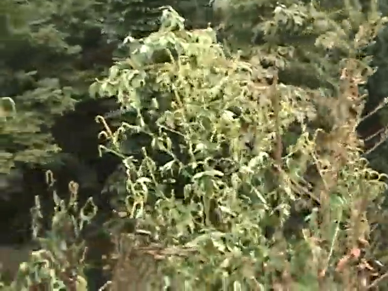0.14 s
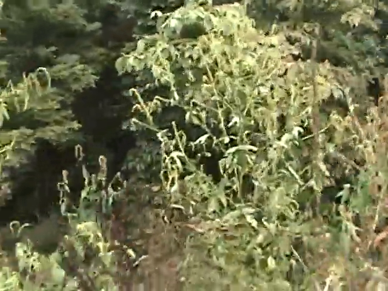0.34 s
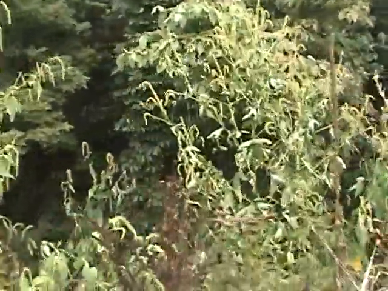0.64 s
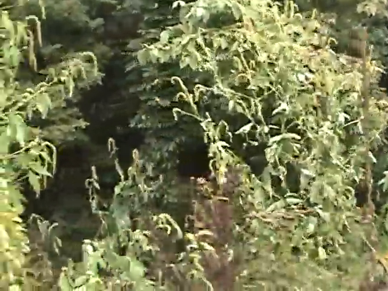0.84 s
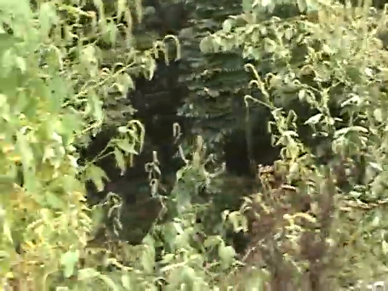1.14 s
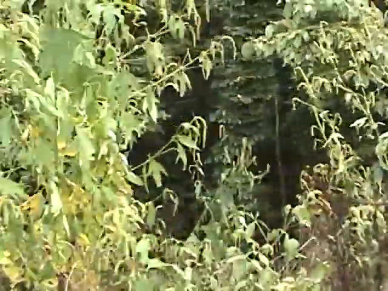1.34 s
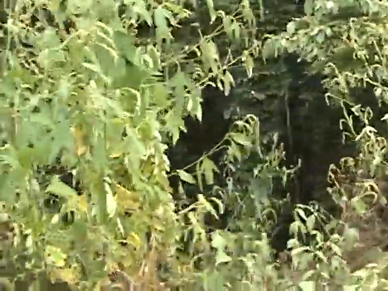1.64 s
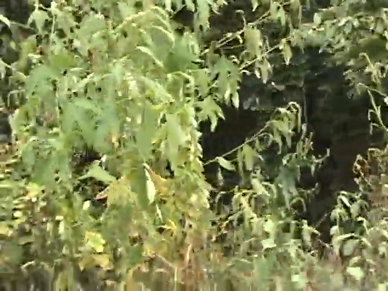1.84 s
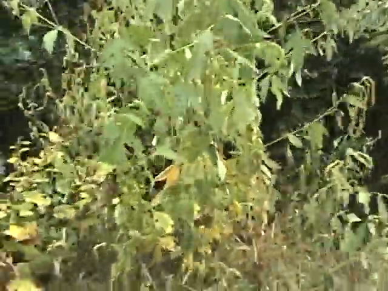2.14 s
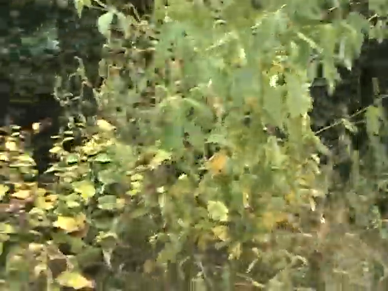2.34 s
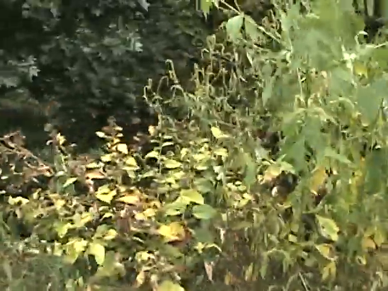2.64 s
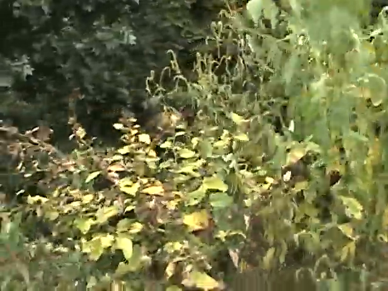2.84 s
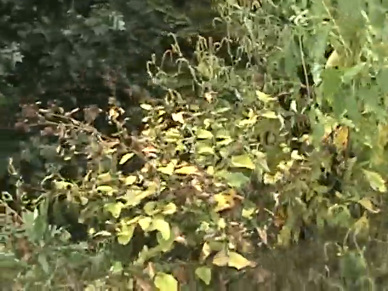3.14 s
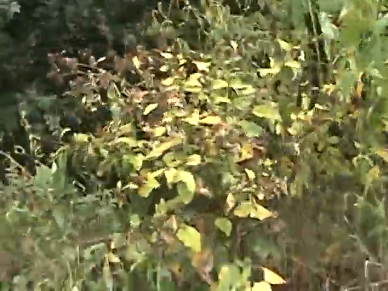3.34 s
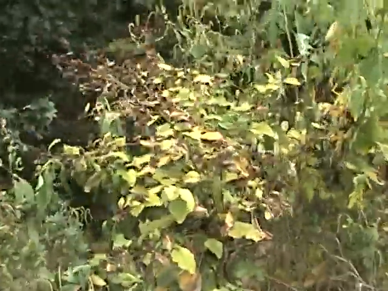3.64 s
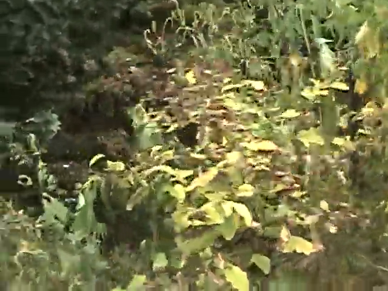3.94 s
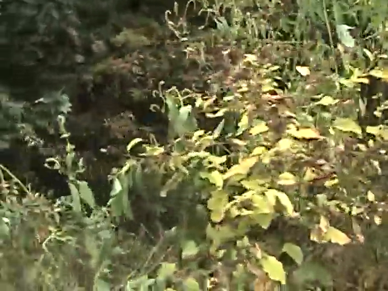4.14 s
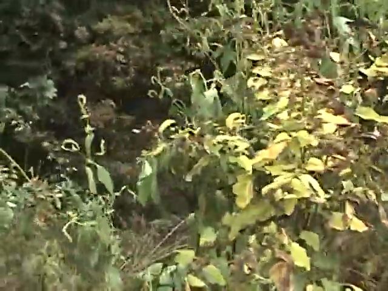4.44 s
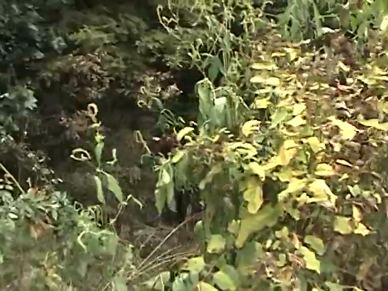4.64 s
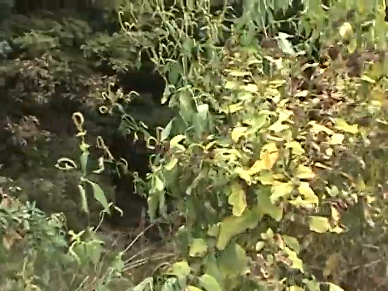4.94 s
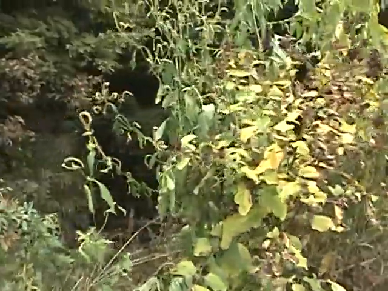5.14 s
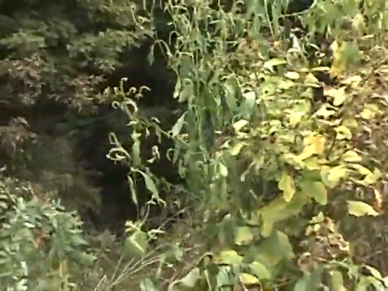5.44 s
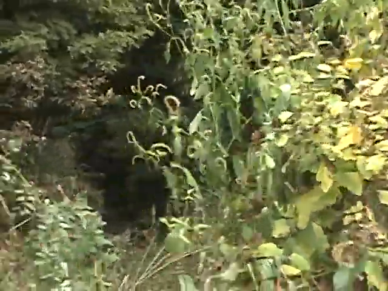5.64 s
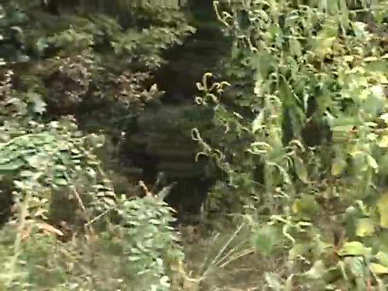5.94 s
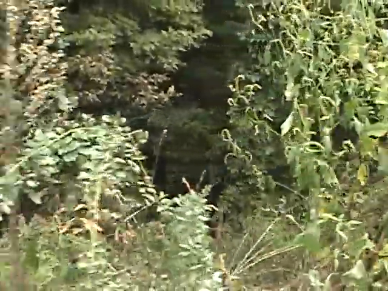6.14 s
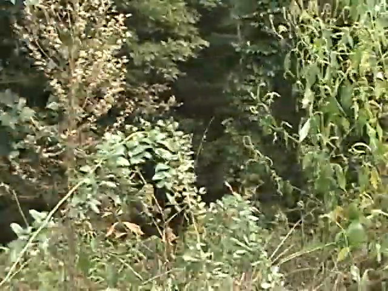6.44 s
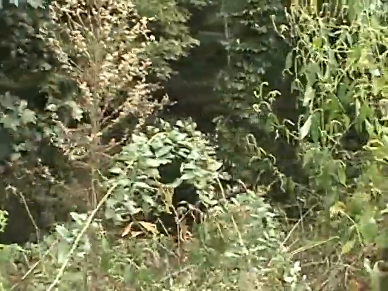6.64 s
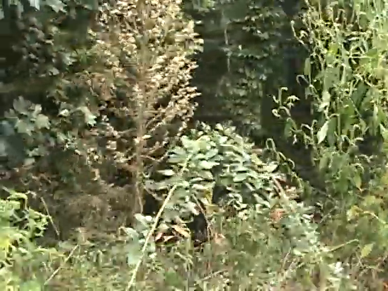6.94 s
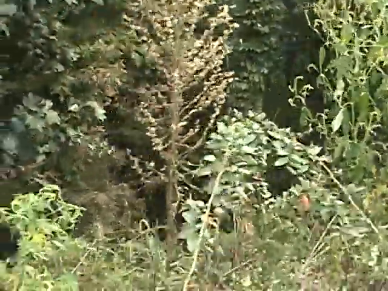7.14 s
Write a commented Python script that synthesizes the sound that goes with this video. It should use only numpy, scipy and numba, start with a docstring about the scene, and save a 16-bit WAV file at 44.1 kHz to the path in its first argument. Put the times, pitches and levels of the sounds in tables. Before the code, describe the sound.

Over a soft woodland hush and pulsing high insect choirs, crickets chirp in short bright strokes and a katydid rasps about four times a second, growing slightly louder. Some way off, a small hound bays from about 0.25 s with a hoarse bark; a sharp high cry and another bay follow near 1 s as low wind buffets the microphone around 1.3 s. After a brief gap, the pack returns at 1.7 s, overlapping long bays, rough barks and quick yips that echo among the trunks, busy and urgent from 2 to 5.9 s. Dry stalks rustle, tiny twigs tick and light camera knocks intrude, notably near 3.6 s. A stronger knock lands at 6.0 s as the echoes die, leaving crickets, insects and small handling clicks. At about 7.05 s a hoarse bark and short bays break out again, continuing almost to the end at about 7.3 s.

```python
"""In damp woods, a pack of small hounds bays some way off, voices overlapping and echoing among the trunks.
Bays are stacked partials on wavering pitches, hoarse barks are ringing slaps; yips, the scooped starts of
barks and a faint far call are short glides. Crickets chirp as short fading tones; katydids and far insect
choirs are pulsing bands of noise. Filtered noise makes hush, rustling stalks and wind that buffets the
hand-held camera; short tones make its knocks and the ticks of twigs, short noise bursts the knocks' clicks."""
import sys
import numpy as np
from scipy import signal
from scipy.fft import next_fast_len
from scipy.io import wavfile
from scipy.ndimage import uniform_filter1d
from numba import njit

SR = 44100
rng = np.random.default_rng(int(sys.argv[2]) if len(sys.argv) > 2 else 0)


def store_wav(level_fs):
    """Save 16-bit WAV to argv[1]."""
    pcm = np.round(np.clip(np.atleast_2d(level_fs), -1, 1) * 32767)
    wavfile.write(sys.argv[1], SR, pcm.T.astype(np.int16))


def magnitude_from_level(level_db):
    """Linear magnitude for a level in decibels (20 dB per decade)."""
    exponent = np.asarray(level_db, float) / 20
    return 10 ** exponent


N = 321489  # length in samples
T = np.arange(N) / SR  # time in seconds

# Far hush. Each row: frequency in Hz, relative density in dB per Hz before the whole is set to its level.
HUSH = [(59, -32), (100, 16.5), (743, 12.5), (1960, 4), (3290, 0), (3560, -16), (4800, 6.5), (5740, -15.5),
        (6860, -26.5), (10600, -61.5), (11500, -40), (15000, -70), (22000, -120)]
# Wind gusts. Each row: time in seconds, level of the middle signal in dB; the side signal is stronger.
GUSTS = [(0, -59.5), (.59, -62.5), (.93, -50.5), (1.26, -42.5), (1.54, -53), (1.83, -82), (2.3, -65.5),
         (3.0, -53), (3.45, -69.5), (4.12, -79), (4.67, -51.5), (4.91, -71), (6.0, -70), (7.29, -73)]
# Choirs of far insects. Each row: centre in Hz, width of each filter pass in Hz, level in dB,
# average pulses per second, pulse depth from 0 to 1.
INSECT_CHOIRS = [(3280, 40, -62.5, 58, 0.7), (4800, 890, -55.5, 33, 0.32), (4380, 88, -73, 4.3, 1),
                 (6810, 860, -62, 55, 0.5), (7670, 1000, -64, 56, 0.2)]
# Brushes against stalks. Each row: time of the peak in seconds, swell in dB before the crackles' own level.
STALK_BRUSHES = [(0.01, -65.5), (1.02, -61.5), (1.72, -60.5), (2.631, -58.5), (3.58, -59), (5.08, -59.5),
                 (5.36, -72.5)]
# Cricket chirps. Each row: start of the last stroke in seconds, peak in dB, starting pitch in Hz, strokes.
CRICKET_CHIRPS = [(.0584, -39, 5040, 2), (0.316, -42, 4580, 3), (.5766, -44, 5120, 2),
                  (1.1428, -41, 5160, 3), (1.2286, -44, 4960, 1), (1.4147, -40.5, 5140, 3),
                  (1.917, -39, 5160, 3), (2.5301, -39.5, 5120, 3), (3.0664, -40, 5130, 3),
                  (4.7082, -44.5, 4930, 3), (5.3542, -45, 4980, 3), (5.69, -46, 4960, 2),
                  (6.0218, -44, 4920, 3), (6.2208, -50, 5130, 1), (6.4338, -45, 4920, 3),
                  (6.9652, -45.5, 4940, 3), (7.195, -47, 5120, 1)]
# Single notes of a tree cricket. Each row: start in seconds, peak in dB, pitch in Hz.
TREE_CRICKET_NOTES = [(4.88, -39, 3270), (6.672, -49, 3280), (7.15, -60, 3300)]
# Short voiced glides: yips, scooped starts of barks, a faint far call and high overtones of bays.
# Each row: start in seconds, length in seconds, first pitch in Hz, last pitch in Hz (both before wavering),
# level of the fundamental at its fullest in dB.
VOICED_GLIDES = [(0.057, 0.058, 735, 790, -51), (2.0, 0.021, 1410, 1450, -28),
                 (2.01, 0.034, 3560, 3660, -48.5), (2.288, 0.054, 3530, 3600, -45),
                 (2.546, 0.053, 1053, 1203, -29.5), (2.858, 0.042, 1416, 1860, -27),
                 (3.412, 0.05, 1078, 960, -30.5), (3.845, 0.032, 1450, 1366, -31),
                 (3.996, 0.044, 1560, 1793, -37), (4.163, 0.035, 1085, 1086, -27),
                 (4.489, 0.053, 995, 1003, -29), (4.547, 0.046, 1064, 1180, -29),
                 (4.635, 0.076, 964, 1034, -27), (4.82, 0.045, 1135, 1134, -27),
                 (5.017, 0.03, 1654, 1570, -24), (5.405, .09, 3000, 3060, -45),
                 (5.635, 0.048, 955, 1258, -22.5), (5.663, 0.03, 1654, 1606, -24),
                 (5.712, 0.11, 2533, 2256, -36)]
# Broad clicks of handling knocks. Each row: start in seconds, starting strength in dB before the filter.
KNOCK_CLICKS = [(.1, -36), (6.54, -35), (6.94, -47), (7.275, -44)]
# Katydid voice. One row: centre in Hz, width of each filter pass in Hz, rasp in dB at the start and at the end.
KATYDID_VOICE = (8429.5, 464, -68.5, -63.5)
# Katydid rhythm. One row: first rasp in seconds, spacing in seconds, rasp length in seconds.
KATYDID_RHYTHM = (.115, .228, .08)
# Hoarse, broken barks. Each row: start in seconds, length in seconds, starting effort in dB before the
# resonances add theirs, fall over the bark in dB, share of the bright part in dB.
HOARSE_BARKS = [(0.23, 0.14, -34.5, 1.5, -7), (.985, 0.23, -32, 9, -8.5), (1.752, 0.16, -27.5, 9, -30),
                (1.993, 0.065, -32, 9, -14), (2.093, 0.09, -22, 12.5, -25), (2.255, 0.54, -42, 0.5, -21),
                (2.872, 0.34, -33.5, -5.5, -46), (3.406, 0.13, -30, 7.5, -36),
                (3.511, 0.18, -23, 6.5, -19.5), (3.836, 0.2, -37.5, 17, -5.5),
                (3.978, 0.27, -31.5, 0.5, -18), (4.455, 0.14, -38.5, 8, -26), (4.625, 0.29, -34, -2, -20),
                (5.005, 0.29, -28, 12, -42), (5.226, 0.19, -30, 2.5, -30), (5.657, 0.22, -33, -5.8, -26),
                (7.039, 0.15, -40.5, 7, -7)]
# Throat resonances. Each row: centre in Hz, width of each filter pass in Hz, level in dB before the effort.
THROAT_RESONANCES = [(801, 167, 1), (2007, 110, -12.5)]
# Bays. Each row: left minus right in dB, pitch unsteadiness as a share, mouth resonance in Hz, course.
# Each course row: time in seconds, pitch in Hz, fundamental in dB, strongest overtone in dB, before wavering,
# shaking and overtone cuts. A cracked voice ends with the change of its odd overtones in dB.
BAY_COURSES = [ (0.55, .008, 1760, [(.243, 720, -60, -43), (.28, 769, -60, -31.5), (.31, 795, -63, -33)]),
               (-0.33, 0.0074, 750, [(.255, 480.5, -46, -48), (.31, 534.4, -31, -22.5),
               (.38, 549.8, -31.5, -33.5), (.46, 544.2, -33.5, -27.5), (.66, 546.6, -32.5, -37.5),
               (.78, 546.6, -33, -34)]), (-.5, 0.0054, 1255, [(.775, 542, -28.5, -43.5),
               (.84, 551.4, -25, -37), (.93, 569.7, -34, -31), (.99, 602, -53, -59)]),
               (.5, 0.021, 3100, [(.971, 1870, -25, -40), (.992, 1744, -15.5, -26.5),
               (1.03, 1602, -24.5, -36.5)]), (0.46, 0.0209, 2100, [(1.005, 808, -50, -17),
               (1.04, 800, -28, -40), (1.1, 825.6, -21, -28), (1.16, 814.6, -32, -24),
               (1.3, 824, -43.5, -37.5), (1.5, 827.5, -39.5, -58)], -27.5),
               (-0.82, 0.022, 1550, [(1.71, 636, -40, -42.5), (1.77, 643, -38.5, -32.5),
               (1.85, 665, -19, -44.5), (1.95, 676, -30.5, -57), (2.08, 707.6, -24, -40),
               (2.2, 715, -32.5, -37)]), (-.5, 0.0087, 1200, [(2.07, 514.5, -54, -32),
               (2.14, 532, -32, -24), (2.25, 549.6, -43.5, -43), (2.45, 531.8, -42.5, -51),
               (2.85, 517.1, -40.5, -42.5)]), (-1.2, 0.017, 1600, [(2.2, 718, -39, -45),
               (2.3, 709, -27.5, -36.5), (2.38, 701.4, -22.5, -33), (2.5, 710.8, -21, -56),
               (2.6, 683.4, -19, -36), (2.68, 706.8, -22, -41.5), (2.76, 690.7, -36, -46.5),
               (2.86, 700, -52, -60)]), (-1.2, .02, 1700, [(2.89, 648.3, -33, -28), (2.94, 628.6, -17, -39),
               (3.05, 643, -39, -39.5), (3.2, 641, -59, -44)]), (-.5, 0.0033, 1300, [(2.9, 537.3, -55, -42),
               (2.95, 545, -36, -41.5), (3.15, 529.6, -42.5, -37.5)]),
               (-1.2, 0.0158, 1700, [(3.44, 707, -26.5, -48), (3.5, 706, -29, -39),
               (3.6, 696.8, -21.5, -34.5), (3.7, 679, -23, -44), (3.8, 674, -56.5, -65),
               (3.93, 672, -20.5, -41), (4.04, 696, -29, -51)]),
               (.6, 0.0078, 1600, [(3.515, 626, -29, -35.5), (3.6, 628, -32.5, -29.5),
               (3.7, 650.6, -26, -53), (3.8, 612, -37, -51)]), (.6, 0.016, 1200, [(4.02, 576.7, -43, -29.5),
               (4.12, 584, -41.5, -39), (4.26, 581, -33.5, -40)]),
               (.6, 0.01, 1750, [(4.26, 579.4, -38, -39), (4.34, 599.6, -38.5, -39),
               (4.39, 617.4, -36, -32), (4.48, 638, -23, -58)]),
               (-1.2, 0.0099, 1320, [(4.39, 617, -28, -22.5), (4.44, 664.8, -26.5, -35),
               (4.52, 674.6, -20, -36.5), (4.6, 625, -37.5, -37)]),
               (-1.2, .01, 1680, [(4.685, 712.8, -26.5, -40), (4.76, 678.7, -18, -44),
               (4.85, 686, -37, -38), (4.96, 721, -26.5, -49)]), (.6, 0.0094, 1900, [(4.7, 634, -35, -43),
               (4.78, 615.3, -29.5, -27), (4.87, 666, -25, -30.5), (4.94, 658, -31, -56)]),
               (-1.2, 0.016, 1630, [(4.99, 699.5, -19.5, -36), (5.08, 735.4, -20, -52),
               (5.2, 730, -44, -39)]), (.6, 0.0152, 1100, [(5.04, 602, -29, -41), (5.12, 594, -35, -50),
               (5.25, 611, -49.5, -49), (5.42, 585, -43, -39)]),
               (-1.2, 0.007, 1480, [(5.225, 672.3, -43, -28), (5.29, 698.5, -19, -26.5),
               (5.35, 725, -24, -23.5), (5.43, 757, -57, -49), (5.6, 691, -22, -63)]),
               (0.55, 0.027, 1630, [(5.685, 602, -47, -30), (5.74, 597.5, -28, -30), (5.85, 594, -61, -61),
               (5.97, 610, -63, -80)]), (.5, 0.0033, 1400, [(7.035, 773, -30, -57), (7.055, 883, -45, -52),
               (7.072, 1000, -42, -43)]), (-.5, 0.011, 1100, [(7.035, 481, -71, -61),
               (7.08, 511.5, -26, -32), (7.15, 542, -31.5, -31.5), (7.23, 531, -21, -39),
               (7.29, 533, -48, -53)]), ]
# Camera knocks. Each row: start in seconds, peak in dB before the filter, starting pitch in Hz.
CAMERA_KNOCKS = [(0.346, -28, 476), (1.934, -29.5, 410), (3.6, -26.5, 299), (3.631, -26.5, 303),
                 (4.235, -36, 208), (5.187, -36.5, 423), (6.026, -19, 410), (6.548, -41, 226),
                 (6.939, -35, 200)]
# Twig ticks. Each row: start in seconds, peak in dB, starting pitch in Hz.
TWIG_TICKS = [(0.403, -35.5, 8850), (0.7347, -53, 6060), (0.8434, -42, 9400), (1.7188, -39, 6560),
              (2.4808, -37.5, 5560), (2.7555, -42, 7600), (2.9588, -41, 6200), (3.3628, -41, 6930),
              (4.1347, -41.5, 9240), (4.7485, -37, 8590), (5.6875, -41, 5680), (5.891, -37, 5760),
              (6.5494, -51, 8300), (6.8966, -36.5, 9100)]


def level(x, db):
    """Scale to an rms level."""
    return x * magnitude_from_level(db) / np.sqrt(np.mean(x ** 2))


@njit
def svf(x, hz, width):
    """State-variable band-pass with a moving centre, gain 1 there."""
    y, b, l = np.empty(len(x)), 0., 0.
    for i in range(len(x)):
        g, k = np.tan(np.pi * hz[i] / SR), width / hz[i]
        v = (b + g * (x[i] - l)) / (1 + g * (g + k))
        b, l, y[i] = 2 * v - b, l + 2 * g * v, k * v
    return y


def band(x, hz, width):
    """A steep resonance: the filter twice."""
    hz = hz + np.zeros(len(x))
    once = svf(x, hz, 1. * width)
    return svf(once, hz, 1. * width)


def walk(rate, size=N):
    """Random levels held 1 / rate seconds and smoothed twice; spread near 1."""
    k = int(SR / rate)
    steps = np.repeat(rng.standard_normal(size // k + 1), k)
    return 1.3 * uniform_filter1d(uniform_filter1d(steps, k), k)[:size]


def columns(rows, edge_s=0.0084):
    """Sample span, fade at both ends and interpolated columns of a curve table."""
    s, *cols = np.transpose(rows)
    span = slice(int(s[0] * SR), int(s[-1] * SR))
    t = T[span]
    fade = np.clip(np.minimum(t - s[0], s[-1] - t) / edge_s, 0, 1)
    return span, fade, [np.interp(t, s, c) for c in cols]


def spread(mid, side, pan_db=0.):
    """Left and right from mid and side; pan_db is left minus right."""
    return (mid + side * np.array([[1], [-1]])) * magnitude_from_level(np.array([[pan_db], [-pan_db]]) / 2)


def pings(events, decay_s, rise_s, glide):
    """Short damped tones; glide is the pitch change per second as a share of the starting pitch."""
    out, t = np.zeros(N + SR), T[:int(8 * (decay_s + rise_s) * SR)]
    shape = (1 - np.exp(-t / rise_s)) * np.exp(-t / decay_s)
    shape = shape / shape.max()
    for s, db, hz in events:
        i = int(s * SR)
        out[i:i + len(t)] += magnitude_from_level(db) * shape * np.sin(2 * np.pi * hz * (t + glide * t ** 2 / 2))
    return out[:N]


def air():
    """Far hush: noise in half-octave steps whose levels flicker a little."""
    out, (f, dbs) = 0, np.transpose(HUSH)
    for hz in 110 * 2 ** np.arange(0, 6.7, .5):
        mid, side = (svf(rng.standard_normal(N), hz + 0 * T, hz / 3.2) for _ in range(2))
        band_db = np.interp(np.log(hz), np.log(f), dbs) + 3.2 * walk(24)
        out = out + magnitude_from_level(band_db) * spread(mid, .5 * side)
    return level(out, -49.5)


def wind():
    """Gusts rumble on the microphone ports as low noise, reaching them far out of phase."""
    mid, other = (level(svf(band(rng.standard_normal(N), 50, 180), 45 + 0 * T, 90.), 0) for _ in range(2))
    quarter_turn = signal.hilbert(mid, next_fast_len(N))[:N].imag  # every frequency shifted by 90 degrees
    side = 1.5 * quarter_turn + .9 * other
    return spread(mid, side) * magnitude_from_level(np.interp(T, *np.transpose(GUSTS)))


def choirs():
    """Many insects of a kind blur into a pulsing, wavering band of noise."""
    out = 0
    for hz, width, db, rate, depth in INSECT_CHOIRS:
        phase = 2 * np.pi * np.cumsum(rate * (1 + 0.069 * walk(2.0))) / SR
        beat = 1 + np.clip(depth, 0, 1) * np.sin(phase)
        mid, side = (band(rng.standard_normal(N), hz, width) for _ in range(2))
        waver = magnitude_from_level(4.4 * walk(3.83))
        out = out + level(waver * beat * spread(mid, 0.4 * side, pan_db=5.5), db)
    return out


def leaves():
    """Brushed stalks: a spray of tiny crackles of scattered size over a steady faint rustle."""
    rise_s, fall_s, rustle_db = 0.035, 0.092, -69  # rustle before the crackles' own level
    sizes_db = [np.minimum(5.7 * rng.exponential(size=N), 18) for _ in range(2)]
    mid, side = (svf(rng.standard_normal(N) * magnitude_from_level(db), 6500 + 0 * T, 3700.0) for db in sizes_db)
    swell = magnitude_from_level(rustle_db)
    for s, db in STALK_BRUSHES:
        swell = swell + magnitude_from_level(db) * np.exp(np.minimum((T - s) / rise_s, (s - T) / fall_s))
    return level(spread(mid, 0.73 * side), 7.6) * swell


def crickets():
    """Each chirp is a few evenly spaced, equally strong wing strokes; a tree cricket adds single notes."""
    stroke_gap_s = .0415
    strokes = [(s - k * stroke_gap_s, db, hz) for s, db, hz, n in CRICKET_CHIRPS for k in range(round(n))]
    chirps = pings(strokes, decay_s=0.01, rise_s=0.006, glide=-1.5)
    peeps = pings(TREE_CRICKET_NOTES, decay_s=0.011, rise_s=0.0066, glide=0)
    return spread(chirps + peeps, 0, pan_db=7.5)


def voiced_glides():
    """Brief, slightly ragged voiced tones whose pitch bends late."""
    octave_db, mouth_hz = -11.5, 1300  # glides pitched above mouth_hz lose their octave
    out, ragged = np.zeros(N), walk(150)
    for s, length, first_hz, last_hz, db in VOICED_GLIDES:
        u = np.linspace(0, 1, int(length * SR))
        span = slice(int(s * SR), int(s * SR) + len(u))
        hz = (first_hz + (last_hz - first_hz) * u ** 1.6) * (1 + .025 * ragged[span])
        phase = 2 * np.pi * np.cumsum(hz) / SR
        octave = magnitude_from_level(octave_db) * np.sin(2 * phase) / (1 + (hz / mouth_hz) ** 8)
        tone = magnitude_from_level(db) * (np.sin(phase) + octave)
        out[span] += np.sqrt(2) * np.sin(np.pi * u) * tone
    return out


def woods(x):
    """Countless trunks scatter the sound back; the treble dies first and arrives from wider angles."""
    t60_s, bright_t60_s, echo_db = 1.22, 0.78, -3  # seconds to fall 60 dB, dull and bright; echo strength
    t = T[:int(1.5 * SR)]
    low = signal.butter(1, 1500, fs=SR, output="sos")
    echoes = []
    for noise in rng.standard_normal((2, len(t))):
        dull = signal.sosfilt(low, noise)
        tail = dull * magnitude_from_level(-60 * t / t60_s) + (noise - dull) * magnitude_from_level(-60 * t / bright_t60_s)
        tail *= 1 - np.exp(-t / 0.0033)  # soft onset
        echoes.append(signal.fftconvolve(x, tail)[:N] * magnitude_from_level(echo_db) / np.sqrt(np.sum(tail ** 2)))
    high = signal.butter(1, 2500, "high", fs=SR, output="sos")
    return spread(echoes[0], 0.65 * signal.sosfilt(high, echoes[1]))


def knock_clicks():
    """Handling knocks click as broad, short bursts of noise."""
    out, t = np.zeros(N + SR), T[:2000]
    for s, db in KNOCK_CLICKS:
        i = int(s * SR)
        out[i:i + len(t)] += magnitude_from_level(db) * rng.standard_normal(len(t)) * np.exp(-t / .006)
    return spread(svf(out[:N], 2300 + 0 * T, 3000.), 0)


def katydid():
    """Evenly spaced rasps: noise shaken by fast wing teeth, growing steadily louder."""
    first, spacing, length = KATYDID_RHYTHM
    hz, width, start_db, end_db = KATYDID_VOICE
    gate = uniform_filter1d(1. * ((T - first) % spacing < length), size=400)
    teeth = 1 + 0.37 * np.sin(2 * np.pi * 105 * T)
    rasp = level(band(rng.standard_normal(N), hz, width), 0)
    return spread(gate * teeth * rasp * magnitude_from_level(np.linspace(start_db, end_db, N)), 0, pan_db=5.5)


def hoarse():
    """Vocal folds slapping at unsteady intervals and strengths ring throat and mouth."""
    cycles = np.cumsum(540 * (1 + .13 * walk(35) + .16 * walk(450))) / SR
    strength_db = 3 * rng.standard_normal(N) + 2.5 * walk(22)
    slaps = np.diff(np.floor(cycles), prepend=0) * magnitude_from_level(strength_db)  # one click per whole cycle
    throat = sum(level(band(slaps, f, w), db) for f, w, db in THROAT_RESONANCES)
    mouth = level(band(slaps, 1390, 524), 1.13)
    bright = level(band(band(slaps, 2550, 1400), 2550, 1400), 0)
    out = np.zeros(N)
    for s, length, db, fall_db, bright_db in HOARSE_BARKS:
        span, fade, (effort_db,) = columns([(s, db), (s + length, db - fall_db)], edge_s=0.025)
        out[span] += fade * magnitude_from_level(effort_db) * (throat + mouth + magnitude_from_level(bright_db) * bright)[span]
    return out


def bay(rough, mouth_hz, course, odd_db=0.):
    """Five partials on a wavering pitch; a rougher bay shakes each partial's strength more, up to a limit."""
    # overtones fall away from the mouth resonance, gently at the wide-open start, steeply once settled
    open_db_per_khz, settled_db_per_khz, settle_s = 7, 50.5, 0.16
    voice_top_hz, above_top_db_per_khz = 3600, 28  # partials fade above this top
    fifth_db = -6.5  # the fifth partial is weak in every bay
    out = np.zeros(N)
    span, fade, (hz, first_db, over_db) = columns(course)
    size = len(hz)
    waver = walk(89.74, size=size) + 0.74 * walk(350, size=size)
    phase = 2 * np.pi * np.cumsum(hz * (1 + rough * waver)) / SR
    skirt = settled_db_per_khz + (open_db_per_khz - settled_db_per_khz) * np.exp(-T[:size] / settle_s)
    off_khz = np.abs(np.arange(2, 6)[:, None] * hz - mouth_hz) / 1000
    farther_khz = off_khz - off_khz.min(axis=0)  # than the overtone nearest to the resonance
    overtones_db = over_db - skirt * farther_khz + [[0], [odd_db], [0], [odd_db + fifth_db]]
    for number, db in enumerate([first_db, *overtones_db], start=1):
        shake_db = min(270 * rough, 4.) * walk(40, size=size)
        db = db - above_top_db_per_khz * np.maximum(number * hz - voice_top_hz, 0) / 1e3
        out[span] += np.sqrt(2) * fade * magnitude_from_level(db + shake_db) * np.sin(number * phase)
    return out


def knocks():
    """Knocks of the hand-held camera: low tones that die at once, rounded by a broad resonance."""
    thuds = pings(CAMERA_KNOCKS, decay_s=0.0035, rise_s=0.00046, glide=-5.5)
    return spread(band(thuds, 140, 1000), 0, pan_db=-1.5)


def ticks():
    """Twigs tick: tiny high tones, gone within milliseconds, gliding down."""
    return spread(pings(TWIG_TICKS, decay_s=.0008, rise_s=.0001, glide=-31.), 0, pan_db=.9)


def scene():
    """Pack and woods, insects, air, wind and handling."""
    pack = [(bay(*voice), pan_db) for pan_db, *voice in BAY_COURSES]  # (voice, left minus right in dB)
    pack.append((hoarse() + voiced_glides(), 1.2))
    dogs = sum(spread(voice, 0, pan_db) for voice, pan_db in pack)
    echoes = woods(sum(voice for voice, _ in pack))
    insects = crickets() + choirs() + katydid()
    handling = knocks() + knock_clicks()
    return dogs + echoes + insects + air() + leaves() + wind() + handling + ticks()


def band_limit(x):
    """A steep low-pass at the top of the band."""
    return signal.sosfilt(signal.butter(12, 12360, fs=SR, output="sos"), x)


def record(dry):
    """The camera cuts the treble steeply above 11 kHz."""
    top_cut = signal.ellip(8, .2, 45, 11000, fs=SR, output="sos")
    mix = signal.sosfilt(top_cut, dry)
    return band_limit(mix)


dry = scene()
out = record(dry)
store_wav(out)
```